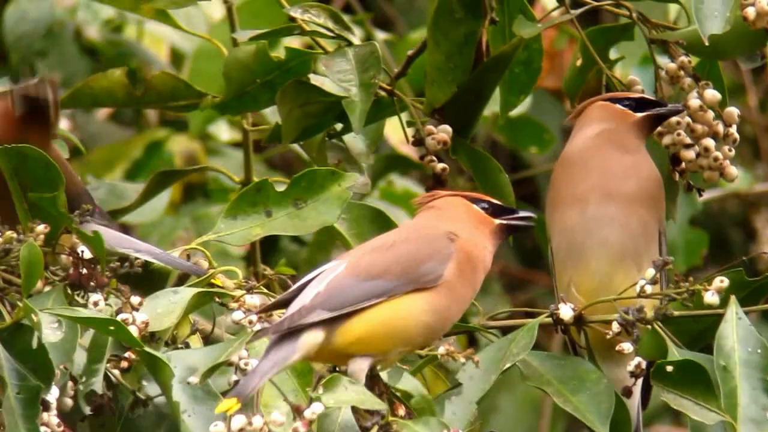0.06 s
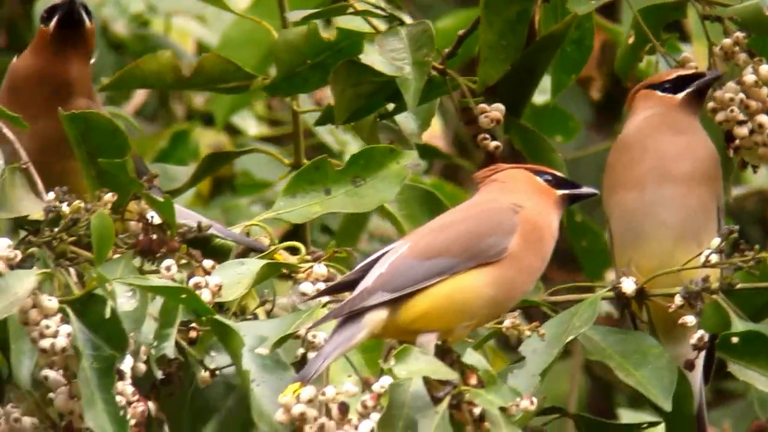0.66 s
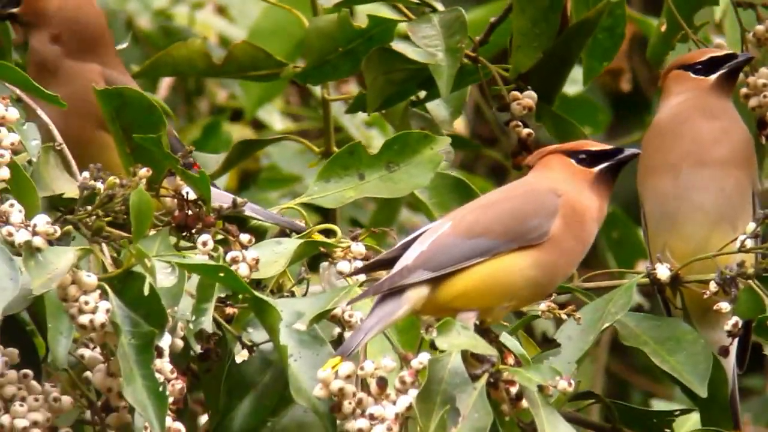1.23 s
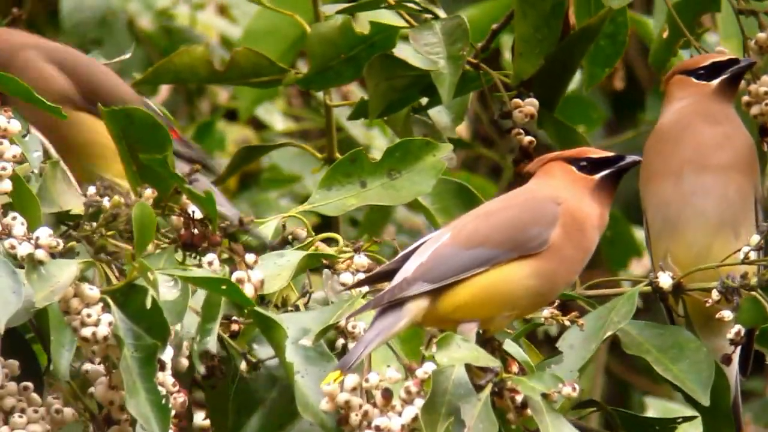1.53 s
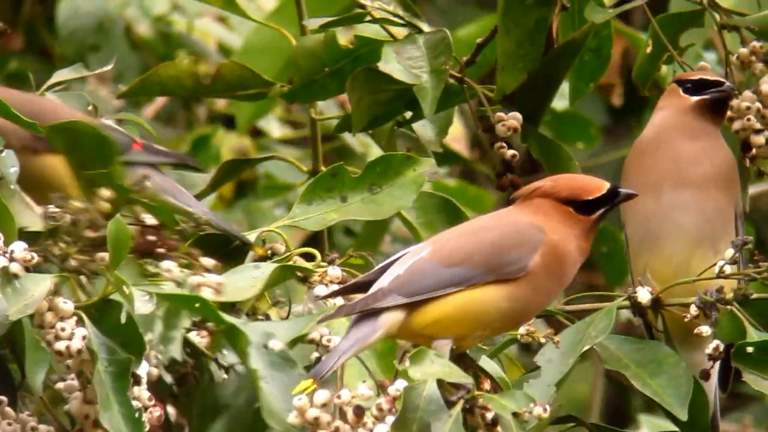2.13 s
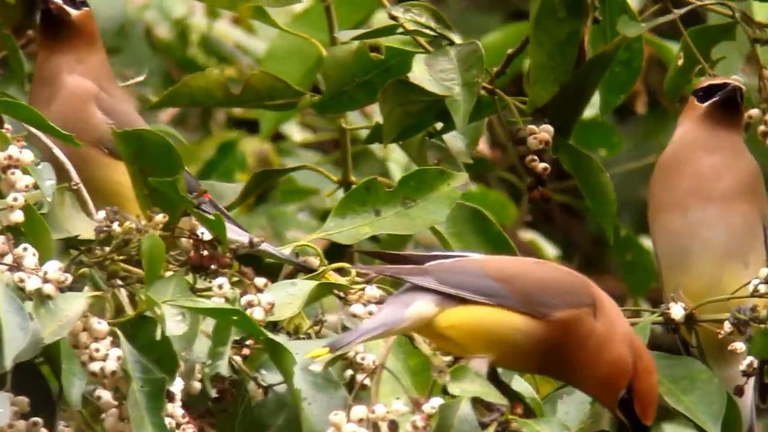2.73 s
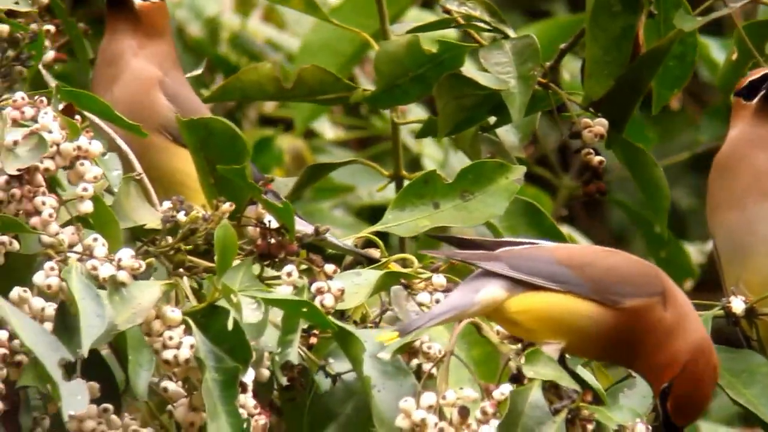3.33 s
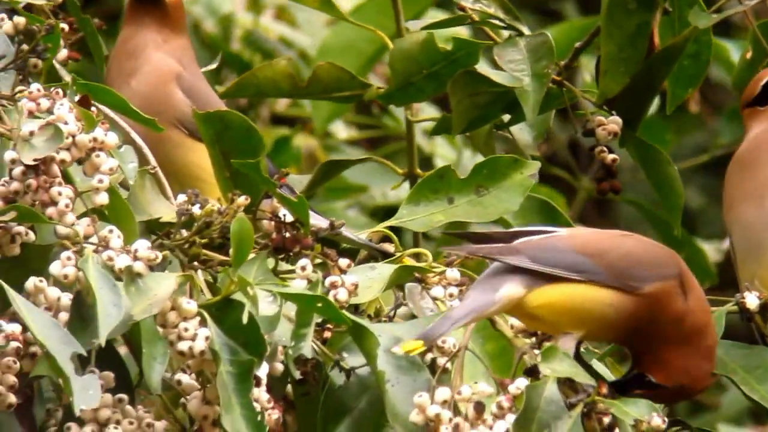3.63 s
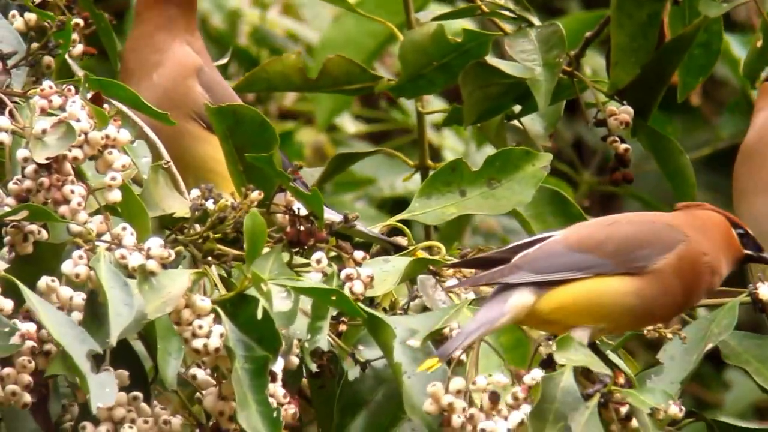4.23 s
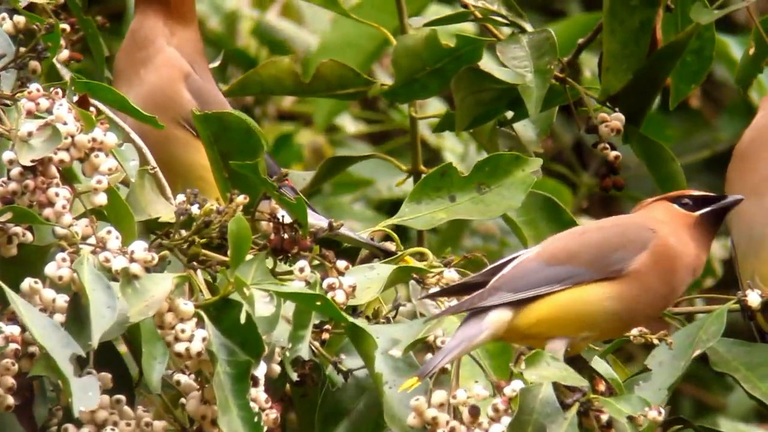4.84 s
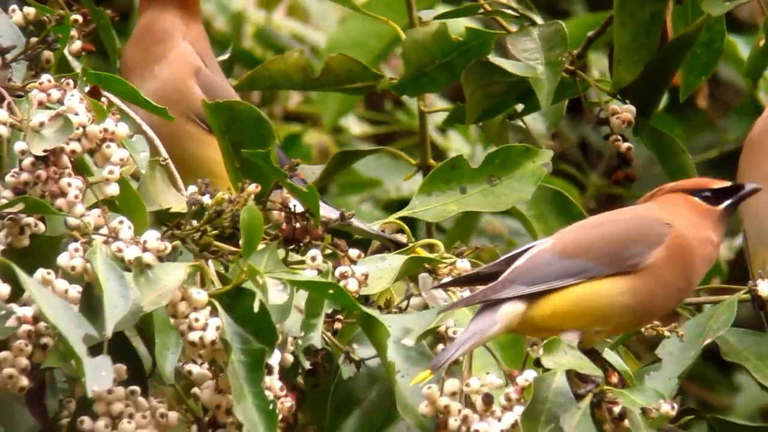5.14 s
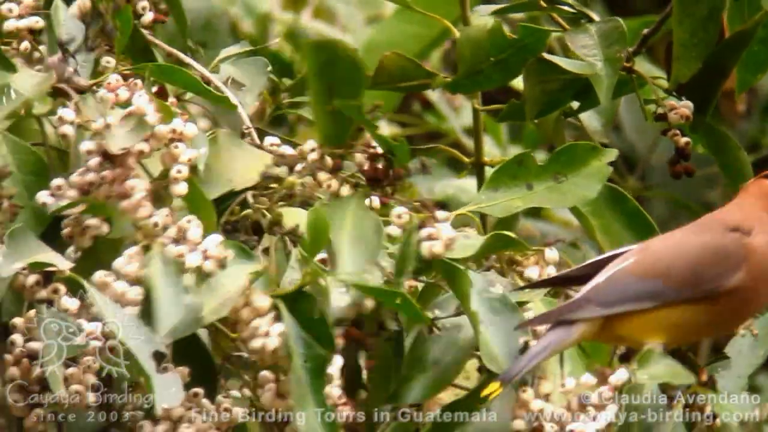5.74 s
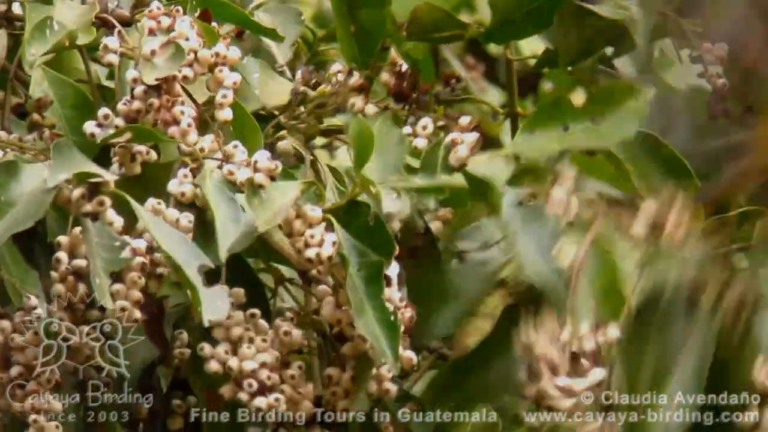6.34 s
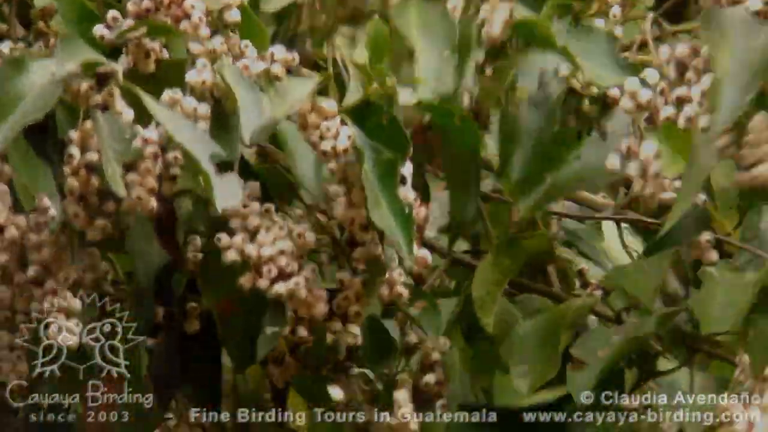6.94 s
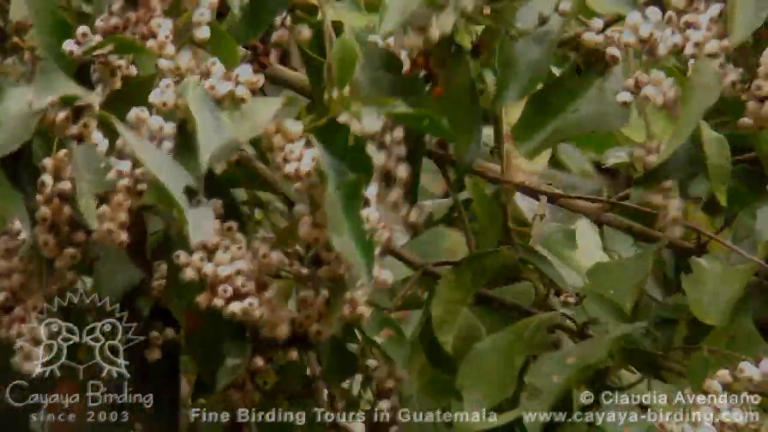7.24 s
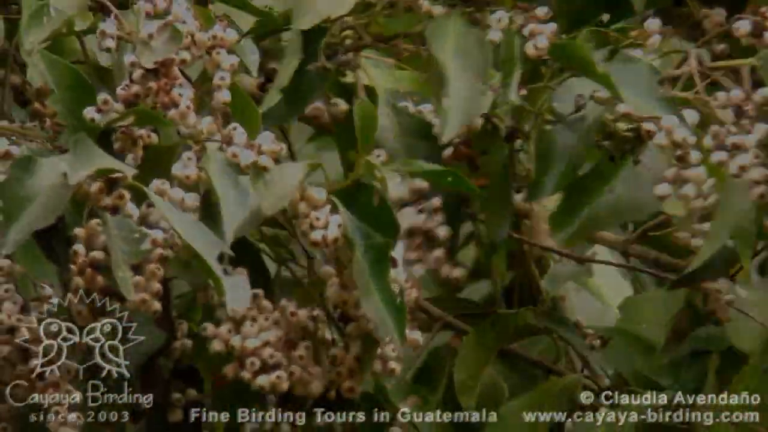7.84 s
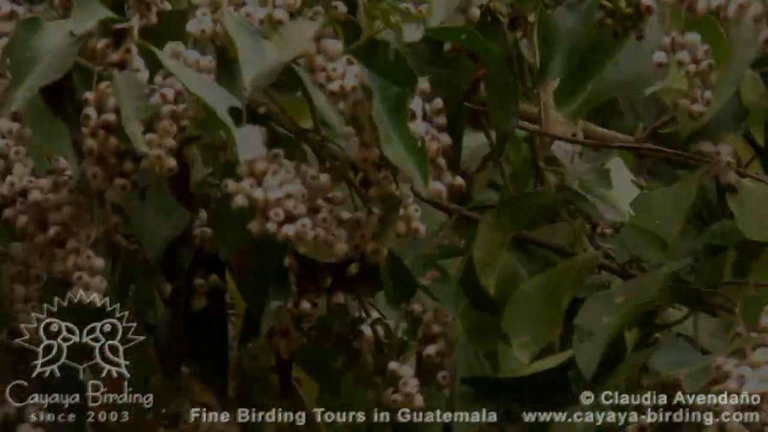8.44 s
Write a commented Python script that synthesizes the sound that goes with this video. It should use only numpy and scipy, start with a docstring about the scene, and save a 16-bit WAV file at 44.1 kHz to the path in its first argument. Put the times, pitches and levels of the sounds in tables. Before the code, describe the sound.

Birds chirp, squeak and whistle in a shrub, one breaking into a fast, raspy trill over faint rumble and hiss.

```python
"""At a berry shrub, birds feed. One gives a loud rattling trill of arched notes, twelve a second;
others add falling chips, thin whistles, lisping twitters and harsh squeaks, all built from gliding sines.
Foliage scatters every call; leaves rustle, twigs and bills tick. Underneath: distant rumble, hiss,
light air on the microphone and the camera's faint whine, with one soft bump near the end."""
import sys
import numpy as np
from scipy import signal
from scipy.fft import rfft, irfft, next_fast_len
from scipy.io import wavfile
from scipy.ndimage import uniform_filter1d, map_coordinates

SR = 44100
rng = np.random.default_rng(int(sys.argv[2]) if len(sys.argv) > 2 else 0)


def waveform_to_disk(signal):
    """Save audio, clipped to [-1, 1], as 16-bit WAV at the path in sys.argv[1]."""
    frames = np.transpose(np.atleast_2d(signal))
    scaled = np.clip(frames, -1, 1) * 32767
    samples = np.round(scaled).astype(np.int16)
    wavfile.write(sys.argv[1], SR, samples)


N = 378378

# spectrum of hiss and ticks: f/Hz, density/dB
HISS_SPECTRUM = [(600, -18), (1500, -8.5), (3000, 1), (4500, -1.5), (6000, -3.5), (7500, -10), (9500, -10),
                 (12000, -10.5), (15500, -16.5)]


def amp(db):
    """Decibels to gain."""
    return 10 ** (np.asarray(db) / 20)


def unit(x):
    """x at rms 1."""
    return x / np.sqrt(np.mean(x ** 2) + 1e-20)


def along(points, hz):
    """(f/Hz, value) points read on a log axis."""
    f, values = np.transpose(points)
    return np.interp(np.log(hz + 1), np.log(f + 1), values)


def wobble(rate_hz):
    """Smooth random curve, rate_hz knots a second."""
    knots = rng.standard_normal(int(N * rate_hz / SR) + 4)
    return map_coordinates(knots, [np.arange(N) * rate_hz / SR], order=2)


def filtered(x, response):
    """x times a frequency response."""
    size = next_fast_len(N + SR // 2)
    return irfft(rfft(x, size) * response(np.fft.rfftfreq(size, 1 / SR)), size)[..., :N]


def coloured(x, colour):
    """x through an (f/Hz, gain/dB) curve."""
    return filtered(x, lambda hz: amp(along(colour, hz)))


def note(start_s, length_s):
    """Sample indices i, progress u (0-1) and a soft-edged gate."""
    u = np.linspace(0, 1, int(length_s * SR))
    gate = np.sin(np.pi / 2 * np.minimum(1, 10 * np.minimum(u, 1 - u)))
    return round(start_s * SR) + np.arange(len(u)), u, gate


def contour(steps, u):
    """Spline through evenly spaced values."""
    return map_coordinates(np.array(steps, float), [u * (len(steps) - 1)], mode="nearest")


def phase_of(hz):
    """Oscillator phase in radians."""
    return 2 * np.pi * np.cumsum(hz) / SR


def panned(x, pan_db):
    """x in stereo, pan_db louder on the left."""
    return x * amp([[pan_db / 2], [-pan_db / 2]])


def stereo_noise(spectrum, patchy_db, likeness=None):
    """Shaped noise of rms 1, its gain patchy in time and frequency."""
    # left-right likeness: f/Hz, correlation
    default_likeness = [(60, 0.926), (180, 0.76), (550, 0.64), (1650, 0.3), (4970, 0.018), (15000, 0.1)]

    def mid_side_gains(hz):
        angle = np.arccos(np.clip(along(likeness or default_likeness, hz), -1, 1)) / 2
        return amp(along(spectrum, hz)) * [np.cos(angle), np.sin(angle)]

    bins = signal.stft(rng.standard_normal((2, N)), nperseg=512)[2]
    patches = uniform_filter1d(rng.standard_normal(bins.shape[1:]), size=7, axis=0)
    patches = unit(uniform_filter1d(patches, size=14, axis=1))
    pair = signal.istft(bins * amp(patchy_db * patches), nperseg=512)[1][:, :N]
    mid, side = filtered(pair, mid_side_gains)
    return unit(np.array([mid + side, mid - side]))


def background(rumble_db, hiss_db, air_db, whine_db, fade_from_s, fade_db_per_s):
    """Distant rumble, hiss and restless air fade late; puffs on the microphone and camera whine do not."""
    # distant rumble: f/Hz, density/dB
    rumble_spectrum = [(41, -16), (70, -2), (199, -7.5), (273, -7), (403, -11.5), (931, -16), (1570, -20),
                       (1750, -20), (2090, -22), (2500, -22.5), (3250, -41), (5500, -120)]
    # air on the microphone: f/Hz, density/dB
    buffet_spectrum = [(12, -56), (20, -4.5), (59, 3), (140, -15), (180, -15), (310, -120)]
    # puffs of air: peak t/s, half length/s, level/dB
    puff_rows = [(0.345, .03, -44), (.53, 0.16, -46.5), (1.002, .06, -50), (5.97, 0.044, -45),
                 (7.124, .08, -55), (8.025, .035, -47), (8.34, 0.037, -39.5)]
    t = np.arange(N) / SR
    fade = amp(-fade_db_per_s * np.maximum(t - fade_from_s, 0))
    hiss = amp(hiss_db) * stereo_noise(HISS_SPECTRUM, patchy_db=0.3)
    rumble = amp(rumble_db) * stereo_noise(rumble_spectrum, patchy_db=0.8)
    breeze = fade * amp(air_db + 1.5 * wobble(9))
    puffs = sum(amp(db) * np.exp(-((t - peak_s) / half_s) ** 2) for peak_s, half_s, db in puff_rows)
    whine = amp(whine_db) * np.sin(phase_of(8802 + 25 * wobble(200)))
    buffet = stereo_noise(buffet_spectrum, patchy_db=3, likeness=[(30, 0.38), (100, 0.36)])
    return fade * (rumble + hiss) + (breeze + puffs) * buffet + whine


def bump():
    """Dull thud through the camera body."""
    # envelope: t/s, level/dB
    envelope = [(8.29, -78), (8.35, -36.5), (8.37, -48.5), (8.41, -85)]
    # camera body: f/Hz, density/dB
    body_spectrum = [(30, -10.5), (100, -1), (200, -3.5), (300, -22), (600, -49.5), (2000, -90)]
    db = np.interp(np.arange(N) / SR, *np.transpose(envelope))
    return amp(db) * stereo_noise(body_spectrum, patchy_db=-0.5)


def rustles(grain_db):
    """Birds brush leaves, which scrape in quick, uneven grains."""
    # brushes: t/s, length/s, level/dB
    brushes = [(.0, 0.245, -50.5), (2.678, 0.11, -51), (5.41, 0.15, -48.5), (6.009, 0.055, -59.5),
               (7.74, .008, -46.5)]
    # leaf scrape: f/Hz, density/dB
    leaf_spectrum = [(600, -18), (1500, -0.5), (3000, 2), (4800, 4), (6500, -8), (10000, -16), (15000, -24)]
    out = np.zeros((2, N))
    grains = unit(stereo_noise(leaf_spectrum, patchy_db=4) * amp(grain_db * wobble(300)))
    for start_s, length_s, db in brushes:
        i, u, _ = note(start_s, length_s)
        out[:, i] += amp(db) * np.sqrt(np.abs(np.sin(np.pi * u))) * grains[:, i]
    return out


def ticks(t60_s):
    """Twigs and bills snap: fast-decaying noise."""
    # snaps: t/s, onset level/dB
    snaps = [(2.6244, -50), (4.824, -66), (5.435, -48), (5.8394, -44.5), (7.541, -50.5), (7.745, -50)]
    out, noise = np.zeros(N), unit(coloured(rng.standard_normal(N), HISS_SPECTRUM))
    for start_s, db in snaps:
        i, u, _ = note(start_s, t60_s)
        out[i] += amp(db - 60 * u) * noise[i]
    return out


def foliage(x, tail_db, echo_db, echo_s, leaves_db):
    """Direct sound plus glints off near leaves, a blurred tree echo and a diffuse tail."""
    # tail decay: f/Hz, t60/s
    decay = [(1000, 0.19), (3500, 0.79), (5200, 0.61), (10000, 0.71)]
    hz, t, bins = signal.stft(rng.standard_normal((2, SR // 2)), SR, nperseg=256)
    tail = signal.istft(bins * amp(-60 * t / along(decay, hz)[:, None]), SR, nperseg=256)[1]
    t = np.arange(tail.shape[1]) / SR
    echo = rng.standard_normal(tail.shape) * np.exp(-((t - echo_s) / 0.012) ** 2)
    leaves = rng.standard_normal(tail.shape) * t * np.exp(-t / 0.00374)
    parts = [(tail_db, tail), (echo_db, echo), (leaves_db, leaves)]
    impulse = sum(amp(db) * part / np.linalg.norm(part[0]) for db, part in parts)
    return x + signal.fftconvolve(x, impulse, axes=1)[:, :N]


def twitters(rate_hz, dip, scatter, flicker_db):
    """Uneven runs of tiny pitch arches at the top of the voice."""
    # runs: t/s, length/s, top f/Hz, level/dB
    runs = [(2.40, .15, 7550, -66), (5.13, .092, 7670, -63), (5.44, .10, 7550, -64),
            (5.834, .09, 7730, -62), (6.42, 0.17, 7050, -60), (6.731, .14, 7300, -59),
            (7.787, 0.21, 7450, -58.5), (8.148, .09, 8010, -61)]
    out, uneven, drift, flicker = np.zeros(N), wobble(30), wobble(50), wobble(70)
    for start_s, length_s, top_hz, db in runs:
        i, _, gate = note(start_s, length_s)
        arch_u = np.cumsum(rate_hz * (1 + 0.156 * uneven[i])) / SR % 1
        hz = top_hz * (1 - dip * (2 * arch_u - 0.8) ** 2 + scatter * drift[i])
        pulses = np.sqrt(np.abs(np.sin(np.pi * arch_u)))
        out[i] += gate * amp(db + flicker_db * flicker[i]) * pulses * np.sin(phase_of(hz))
    return out


def whistles(waver, flicker_db):
    """Thin, nearly pure tones that swell and glide along a shallow bow."""
    # whistles: t/s, length/s, start f/Hz, end f/Hz, upward bow/Hz, level/dB
    calls = [(0.916, 0.15, 4080, 3820, -39, -56), (.96, 0.141, 2392, 2350, 2, -58.5),
             (1.288, 0.23, 7350, 7100, 50, -69.5), (1.75, 0.093, 3480, 3580, 0, -61),
             (1.75, .22, 6370, 6680, 167, -68), (2.207, 0.53, 6300, 5740, -220, -60),
             (4.412, .055, 3470, 4400, 70, -34.5), (4.676, 0.195, 4804, 4680, -40, -64),
             (4.78, .23, 6950, 6830, 13.5, -65), (5.034, 0.078, 6160, 6580, -110, -57),
             (5.151, 0.36, 6650, 6900, 150, -55.5), (5.5, 0.18, 6920, 6870, 100, -56),
             (5.67, .35, 7030, 7014, 170, -61.5), (5.82, .26, 6700, 6626, 40, -67),
             (6.168, 0.17, 5460, 5200, -36, -65), (6.219, .19, 6490, 6650, 77, -69),
             (6.73, .16, 5380, 5160, -2, -66), (7.06, .31, 6880, 6700, 50, -70),
             (7.405, 0.12, 1560, 1523, 0, -54.5), (7.459, 0.082, 3600, 3564, 1, -58),
             (7.641, .13, 4220, 4200, 0, -64)]
    # swell at even steps: level/dB
    swell_db = [-4, 0, -3, -0.5]
    out, drift, flicker = np.zeros(N), wobble(160), wobble(45)
    for start_s, length_s, start_hz, end_hz, bow_hz, db in calls:
        i, u, gate = note(start_s, length_s)
        hz = start_hz + (end_hz - start_hz) * u + bow_hz * (1 - (2 * u - 1) ** 2)
        tone = np.sin(phase_of(hz * (1 + waver * drift[i])))
        out[i] += gate * amp(db + contour(swell_db, u) + flicker_db * flicker[i]) * tone
    return out


def squeaks(jitter):
    """Short falling notes, so rough that the pitch smears."""
    # squeaks: t/s, length/s, start f/Hz, end f/Hz, level/dB
    calls = [(3.393, 0.022, 7280, 6020, -34), (3.795, 0.021, 7400, 6234, -31),
             (5.1, 0.03, 3930, 2860, -43.5), (6.165, 0.027, 3650, 2650, -50),
             (6.466, .033, 3710, 2300, -47), (8.232, 0.028, 2830, 2240, -48.5)]
    out, shake = np.zeros(N), wobble(1800)
    for start_s, length_s, start_hz, end_hz, db in calls:
        i, u, _ = note(start_s, length_s)
        hz = (start_hz + (end_hz - start_hz) * u) * (1 + jitter * shake[i])
        out[i] += amp(db) * np.sin(np.pi * u) * np.sin(phase_of(hz))
    return out


def far_flock(count, min_start_hz, min_db, spread_db, fall_ratio):
    """Rows for chips(): faint, unevenly timed calls from the rest of the flock."""
    when, size, pitch, loud, side = rng.random((count, 5)).T
    start_s = (np.arange(count) + when) / count * (N / SR - 0.1)
    length_s = 0.02 + 0.03 * size
    start_hz = min_start_hz * 1.3 ** pitch
    db = min_db + spread_db * loud ** 2
    return np.transpose([start_s, length_s, start_hz, fall_ratio * start_hz, db, 10 * (side - 0.5)])


def chips(flock, jitter, third_db, sag, flutter_db, near_db, deep_db):
    """Hoarse three-partial falls; fainter ones lie deeper in the shrub. Returns near and deep parts."""
    # chips: t/s, length/s, start f/Hz, end f/Hz, level/dB, left-right/dB
    calls = [(.095, .017, 2350, 1615, -36, -4), (.524, 0.019, 2044, 1194, -47, -3),
             (.595, 0.024, 3220, 1980, -40, 0), (.618, 0.023, 2000, 1450, -46, -2),
             (.697, 0.032, 1636, 1200, -51, -3), (.738, 0.016, 2186, 1690, -39.5, -7),
             (.811, 0.0082, 4330, 2715, -34.5, -9), (.817, .023, 2770, 2080, -41.5, -5),
             (.830, 0.02876, 2400, 1366, -30.5, -5), (1.21, 0.0325, 2680, 2270, -43.5, 3),
             (1.29, 0.043, 1690, 1278, -44, 5), (1.303, 0.029, 2370, 1866, -42.5, 8),
             (1.493, .022, 3240, 1910, -45.5, -4), (1.5, 0.028, 2154, 1567, -41.5, -4),
             (2.325, 0.015, 3280, 2380, -48, 0), (2.399, .022, 3260, 1880, -40, -2),
             (2.522, .023, 2960, 1744, -36.5, 3), (3.65, .04, 2456, 1470, -42, 8),
             (3.8, 0.02, 1700, 1520, -39.5, 0), (4.148, 0.025, 2780, 1790, -39.5, -2),
             (4.168, .031, 1913, 1446, -38.5, -5), (4.508, 0.03, 3090, 1624, -41, 1),
             (4.6, 0.044, 1800, 1156, -44.5, -0.5), (4.62, 0.028, 2860, 2230, -40, -2),
             (4.645, .027, 2040, 1795, -41, 2), (5.016, 0.039, 1805, 1248, -44.5, -1),
             (5.088, .02, 2850, 2740, -42.5, 4), (5.185, 0.016, 2971, 2127, -38, -2),
             (5.205, .017, 1854, 1350, -43, -2), (5.33, .046, 2700, 2073, -49, -4),
             (5.427, 0.0142, 2290, 1610, -36, -6), (5.474, 0.038, 1850, 1435, -47, -2),
             (5.603, .024, 1870, 1230, -48.5, 0), (6.378, 0.029, 1342, 1140, -44, 0),
             (6.432, 0.055, 1626, 1130, -46.5, 6.5), (6.692, .014, 3020, 1770, -39.5, -2.5),
             (6.707, .032, 1694, 1040, -40.5, 0), (6.932, 0.051, 2300, 1714, -50, 1),
             (6.996, 0.0181, 3450, 1911, -39, 0), (7.342, 0.022, 1594, 1434, -50.5, 1),
             (7.443, 0.031, 2233, 1662, -40.5, 5), (7.75, 0.029, 2950, 2140, -48.5, 0),
             (7.795, 0.03, 2975, 2326, -43.5, 2), (8.238, .028, 2200, 1730, -53, -1.5),
             (8.32, 0.024, 1830, 1541, -48, 0)]
    # swell at even steps: level/dB
    swell_db = [-1.5, 0, 0.5, -4, -2]
    # low chips sound on the octave, high ones on the fundamental: start f/Hz, octave re fundamental/dB
    register = [(1700, 8.5), (2400, 12.5), (2700, -13)]
    # voice colour: f/Hz, gain/dB
    throat = [(1000, 4), (2000, -2), (3000, 0.5), (4500, -2.5), (5500, -5), (6500, -24), (9000, -20)]
    out, shake, flutter = np.zeros((2, 2, N)), wobble(900), wobble(350)
    for start_s, length_s, start_hz, end_hz, db, pan_db in np.vstack([calls, flock]):
        i, u, gate = note(start_s, length_s)
        depth = np.clip((near_db - db) / (near_db - deep_db), 0, 1)
        octave_db = along(register, start_hz)
        levels_db = np.array([0, octave_db, octave_db + third_db]) - max(octave_db, 0)
        glide_hz = start_hz * (end_hz / start_hz) ** (u + sag * u * (1 - u))
        phase = phase_of(glide_hz * (1 + jitter * (0.5 + depth) * shake[i]))
        voice = sum(amp(level) * np.sin(k * phase) for k, level in enumerate(levels_db, 1))
        envelope = gate * amp(db + contour(swell_db, u) + flutter_db * flutter[i])
        out[:, :, i] += np.multiply.outer([1 - depth, depth], panned(envelope * voice, pan_db))
    return coloured(out, throat)


def rattle(first_note_s, steady_note_s, settle_s, jitter, flutter_db, vary_db, rasp_db, upper_db, hiss_db):
    """Trill of arched notes, octave strongest; the voice breaks into a rasp at both ends of each."""
    # notes: t/s, top fundamental f/Hz, octave level/dB
    notes = [(2.952, 2807, -32), (3.048, 2688, -31), (3.126, 2587, -32), (3.209, 2510, -32),
             (3.293, 2577, -30.5), (3.373, 2650, -30), (3.456, 2580, -29.5), (3.539, 2619, -32),
             (3.623, 2604, -34.5), (3.703, 2523, -29), (3.785, 2543, -29.5), (3.869, 2547, -29),
             (3.953, 2526, -29), (4.038, 2490, -29.5), (4.120, 2510, -31.5), (4.207, 2498, -31),
             (4.294, 2544, -30.5), (4.381, 2556, -31), (4.479, 2548, -31), (4.592, 2610, -32)]
    # one note at even steps: pitch re top, level/dB, roughness 0-1
    arch = [(.66, -3.5, 0.98), (.84, -6.5, 0.75), (0.96, -2, 0.32), (0.99, -0.5, 0.16), (0.99, -1, 0.12),
            (0.98, 0.5, 0.16), (0.95, -1.5, 0.22), (.88, -2.5, 0.71), (.79, -2.5, 0.84), (0.65, -4, 0.6)]
    # voice colour: f/Hz, gain/dB
    beak = [(1000, -16.5), (3000, 1.5), (5000, -0.5), (6300, 0.5), (7700, -1), (9200, -6.5), (10200, 2.5),
            (11500, 0), (12600, -10), (13600, -9), (15500, -15.5)]
    out, shake, flutter, growl = np.zeros(N), wobble(1700), wobble(900), wobble(1400)
    hiss = amp(hiss_db) * rng.standard_normal(N)
    bend, swell_db, roughness = np.transpose(arch)
    for start_s, top_hz, db in notes:
        extra_s = (first_note_s - steady_note_s) * np.exp((notes[0][0] - start_s) / settle_s)
        i, u, gate = note(start_s, steady_note_s + extra_s)
        fundamental_db = -14.5 - 2 * (db + 30.5)  # re octave; weakens as the bird pushes
        levels_db = [fundamental_db, 0, *upper_db]
        rough = np.clip(contour(roughness, u), 0, 1)
        phase = phase_of(top_hz * contour(bend, u) * (1 + jitter * rough * shake[i]))
        voice = sum(amp(level) * np.sin(k * phase) for k, level in enumerate(levels_db, 1))
        rasp = amp(fundamental_db + rasp_db) * rough * growl[i] * np.sin(phase)  # smears the fundamental
        effort_db = contour(swell_db + vary_db * rng.standard_normal(len(arch)), u)
        envelope = gate * amp(db + effort_db + flutter_db * rough * np.tanh(flutter[i]))
        out[i] += envelope * (voice + rasp + hiss[i])
    return coloured(out, beak)


def scene():
    """Birds at their depths in the shrub, over the background."""
    trill = rattle(first_note_s=0.054, steady_note_s=0.037, settle_s=0.189, jitter=0.085, flutter_db=8,
                   vary_db=1.6, rasp_db=8.5, upper_db=(-17.5, -23.5, -22.5), hiss_db=-23)
    flock = far_flock(count=40, min_start_hz=1614.3, min_db=-62.5, spread_db=6.5, fall_ratio=0.75)
    near, deep = chips(flock, jitter=0.024, third_db=-13.5, sag=0.314, flutter_db=2.5,
                       near_db=-35.5, deep_db=-51)
    near = near + ticks(t60_s=0.025)
    deep = amp(-1.5) * deep + squeaks(jitter=0.0998)
    thin = whistles(waver=0.0042, flicker_db=2.5)
    thin += twitters(rate_hz=50, dip=0.12, scatter=0.029, flicker_db=3.5)
    birds = (foliage(panned(trill, pan_db=-2), tail_db=-1.5, echo_db=-6.5, echo_s=0.041, leaves_db=-4.5)
             + foliage(near, tail_db=-6.5, echo_db=-9.5, echo_s=0.026, leaves_db=-2)
             + foliage(panned(thin, pan_db=1), tail_db=-1.5, echo_db=-7, echo_s=0.028, leaves_db=-3)
             + foliage(deep, tail_db=1, echo_db=-4, echo_s=0.016, leaves_db=0))
    leaves = rustles(grain_db=4)
    bed = background(rumble_db=-49, hiss_db=-55.5, air_db=-53.5, whine_db=-72.5,
                     fade_from_s=5.6, fade_db_per_s=2)
    return birds + leaves + bed + bump()


def record(dry, top_hz=15780):
    """The camera notches a narrow treble band and cuts all above top_hz."""
    # treble notch: f/Hz, gain/dB
    notch = [(7500, 1), (7900, -9), (8120, -39), (8330, -38), (8520, -27.5), (8720, -1)]
    return filtered(dry, lambda hz: amp(along(notch, hz)) * (hz < top_hz))


dry = scene()
out = record(dry)
waveform_to_disk(out)
```